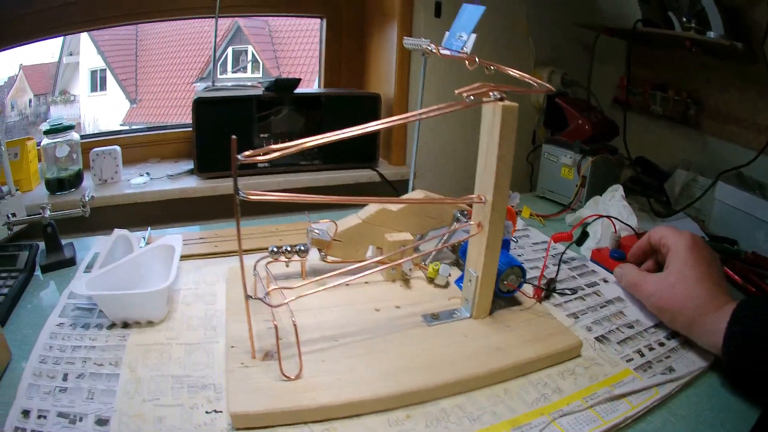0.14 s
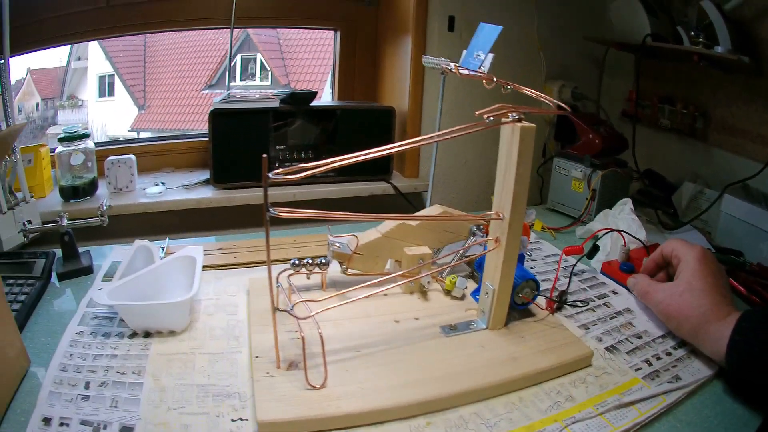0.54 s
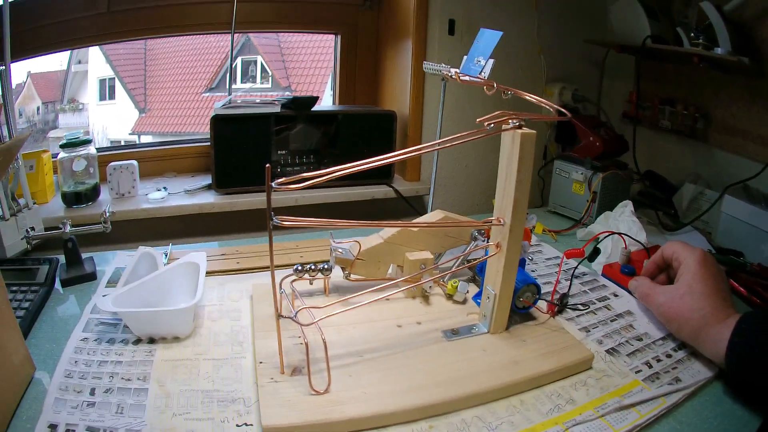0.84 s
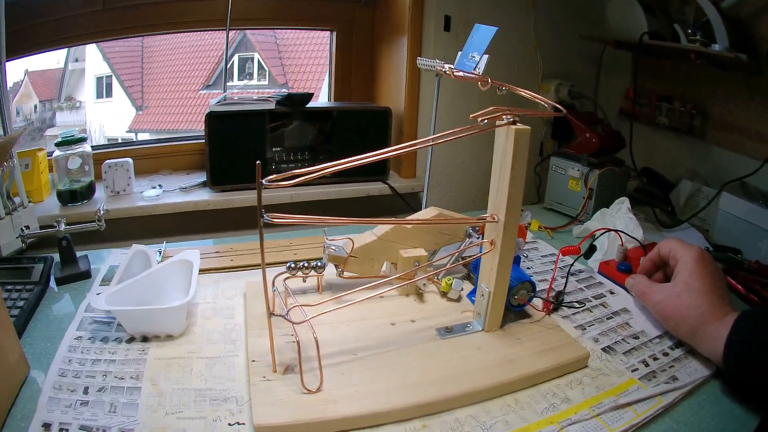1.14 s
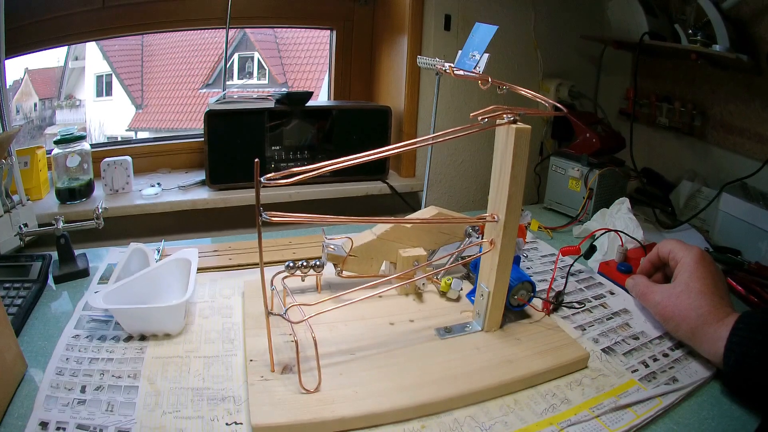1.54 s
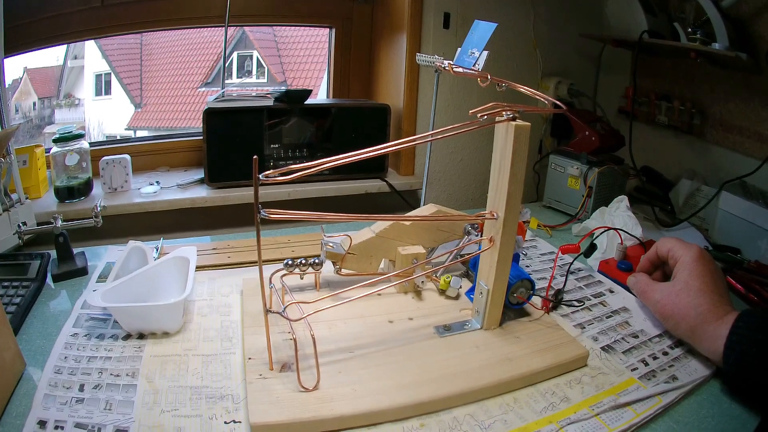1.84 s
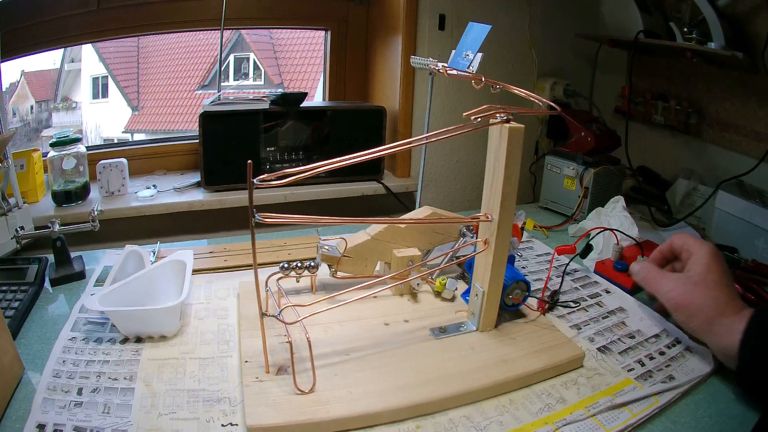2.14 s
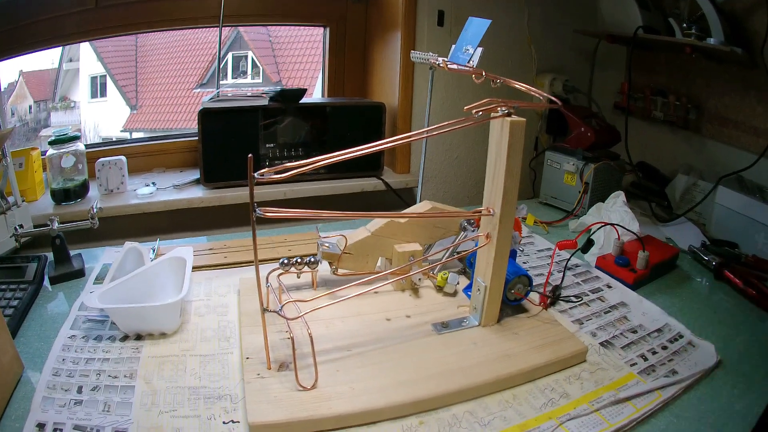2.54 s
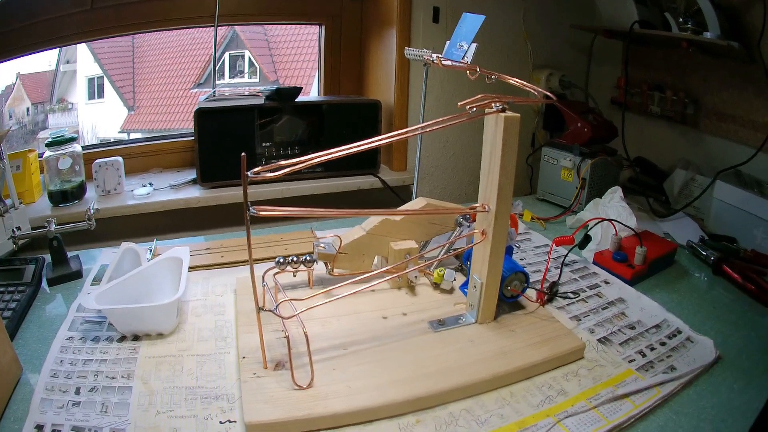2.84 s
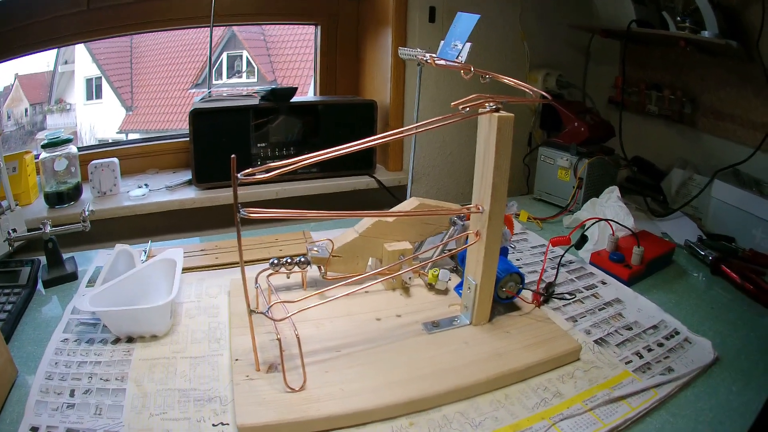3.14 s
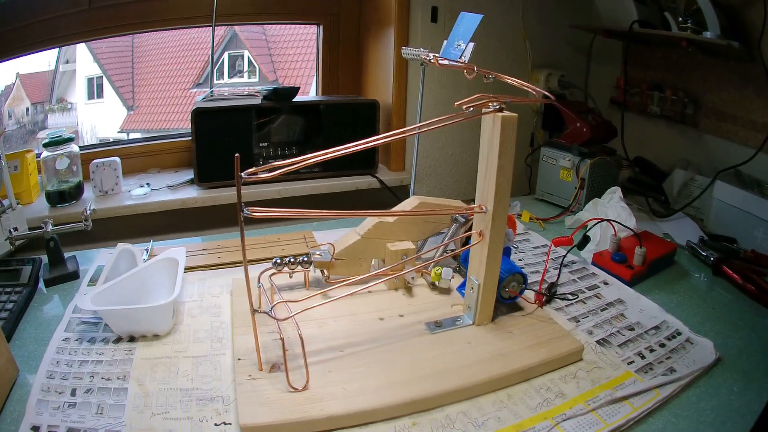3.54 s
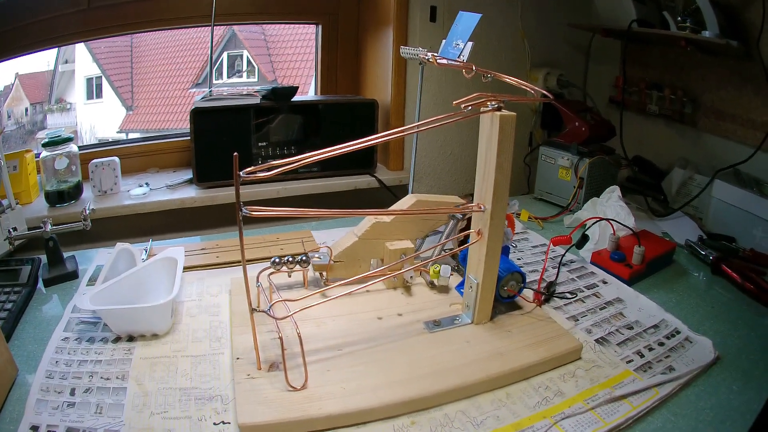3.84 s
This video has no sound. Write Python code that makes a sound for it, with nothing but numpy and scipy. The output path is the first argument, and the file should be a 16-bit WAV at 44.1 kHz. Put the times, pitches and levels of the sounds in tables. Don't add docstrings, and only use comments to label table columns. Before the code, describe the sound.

A small geared motor whirs on a wooden workbench board, starting suddenly after nearly two seconds of faint hiss, a sleeve rub and soft finger taps on a plastic switch; close microphone, small quiet room.

```python
import sys
import numpy as np
from scipy import signal
from scipy.fft import rfft, irfft, next_fast_len
from scipy.io import wavfile
from scipy.ndimage import uniform_filter1d, map_coordinates

SR = 44100
rng = np.random.default_rng(int(sys.argv[2]) if len(sys.argv) > 2 else 0)


def waveform_to_disk(signal):
    frames = np.transpose(np.atleast_2d(signal))
    scaled = np.clip(frames, -1, 1) * 32767
    samples = np.round(scaled).astype(np.int16)
    wavfile.write(sys.argv[1], SR, samples)


def level_to_linear(level):
    exponent = np.asarray(level, float) / 20
    return 10 ** exponent


N = 176400
T = np.arange(N) / SR
MOTOR_ON_S = 1.7535

# frequency in Hz, bandwidth in Hz, level in dB.
CHATTER_MODES = [(1730, 880, -4), (4710, 460, 3), (6300, 1300, -4.5), (7970, 1170, -5), (11000, 2500, -22)]


def unit(x):
    return x / np.sqrt(np.mean(x ** 2) + 1e-20)


def along(points, hz):
    f, v = np.transpose(points)
    return np.interp(np.log(hz + 1), np.log(f + 1), v)


def wobble(rate):
    knots = rng.standard_normal(int(N * rate / SR) + 4)
    return map_coordinates(knots, [T * rate])


def filtered(x, response):
    m = next_fast_len(N + SR // 2)
    return irfft(rfft(x, m) * response(np.fft.rfftfreq(m, 1 / SR)), m)[..., :N]


def ringing(x, modes, signs="+-" * 7):
    def response(f):
        total = 0
        for sign, (centre, width, db) in zip(signs, modes):
            resonance = 1j * f * width / (centre * centre - f * f + 1j * f * width)
            total = total + int(sign + "1") * level_to_linear(db) * resonance
        return total
    return filtered(x, response)


def coloured(spectrum, size=N):
    return unit(filtered(rng.standard_normal(size), lambda hz: level_to_linear(along(spectrum, hz))))


def gate(start, length, edge):
    return np.clip(np.minimum(T - start, start + length - T) / edge + .5, 0, 1)


def fade(start, t60, rise):
    u = np.maximum(T - start, 0)
    return (1 - np.exp(-(u / rise) ** 2)) * level_to_linear(-60 * u / t60)


def preamp_hiss():
    # frequency in Hz, level in dB per Hz.
    hiss_spectrum = [(88, -31), (150, -5), (351, -6), (469, -6), (615, -9), (1520, -14), (2470, -13),
                     (15200, -18)]
    # frequency in Hz, left-right correlation from -1 to 1.
    likeness = [(60, -0.68), (240, 1), (950, 0.98), (3770, 0.37), (15000, 0.67)]

    def mid_side_split(hz):
        angle = np.arccos(np.clip(along(likeness, hz), -1, 1)) / 2
        return np.array([np.cos(angle), np.sin(angle)])
    noise = coloured([(90, -60), (135, -25)] + hiss_spectrum, size=(2, N))
    mid, side = filtered(noise, mid_side_split)
    return level_to_linear(-62.5 + 1.6 * wobble(5.2)) * np.array([mid, side]) / np.std(mid)


def low_drift():
    # frequency in Hz, level in dB per Hz.
    drift_spectrum = [(2, 8), (20, -14), (40, -12.5), (62, -33), (85, -34), (110, -120)]
    return level_to_linear(-55.5) * coloured(drift_spectrum)


def circuit_buzz():
    # frequency in Hz, bandwidth in Hz, level in dB.
    buzz_modes = [(3290, 110, -5), (6610, 330, -3), (9700, 330, -6)]
    rate_hz, first_s, burst_t60, weak = 48.82, .0022, 0.022, 0.36
    beat = (T - first_s) * rate_hz
    strong_burst = level_to_linear(-60 * (beat % 1) / rate_hz / burst_t60)
    weak_burst = weak * level_to_linear(-60 * ((beat + .5) % 1) / rate_hz / burst_t60)
    buzz = unit(ringing((strong_burst + weak_burst) * rng.standard_normal(N), buzz_modes))
    return level_to_linear(-69.5 + 1.0 * wobble(5.8)) * buzz + level_to_linear(-69) * np.sin(2 * np.pi * beat)


def supply_sags():
    sag_times = [.178, .69, 1.18, 1.735, 2.2]
    depth, width_s, after_s, after_depth = 0.0061, 0.0072, .068, 0.69

    def dip(s):
        return np.exp(-((T - s) / width_s) ** 2)
    return depth * sum(dip(s) + after_depth * dip(s + after_s) for s in sag_times)


def camera():
    mid, side = preamp_hiss()
    mid = mid + circuit_buzz() + low_drift()
    side = side - supply_sags()
    return np.array([mid + side, mid - side])


def sleeve_rub():
    rub = coloured([(60, -120), (90, -1), (200, 1), (320, -10), (500, -30), (700, -120)])
    return level_to_linear(-61.5 + 2.5 * wobble(34)) * gate(0.052, .18, 0.047) * rub


def finger_taps():
    # start in seconds, level in dB, frequency in Hz.
    taps = [
        (.303, -47, 656),
        (.7165, -34, 613),
        (.978, -45, 603),
        (1.2835, -29, 633),
        (1.495, -25.5, 625),
        (2.81, -23, 680),
    ]
    t60, rise_s, after_s, after_db = 0.021, 0.0028, 0.0064, -12.5
    out = 0
    for s, db, hz in taps:
        envelope = fade(s, t60, rise_s) + level_to_linear(after_db) * fade(s + after_s, t60, rise_s)
        out = out + level_to_linear(db) * envelope * np.sin(2 * np.pi * hz * (T - s))
    return out


def switch_creaks():
    # start in seconds, level in dB.
    clicks = [
        (0.377, -51.5),
        (.62, -60.5),
        (1.691, -45.5),
        (1.71, -58),
    ]
    creak = unit(ringing(rng.standard_normal(N), [(2200, 220, 8), (3500, 610, 0.5), (4300, 420, -3)]))
    return sum(level_to_linear(db) * fade(s, 0.038, 0.00087) for s, db in clicks) * creak


def start_thud():
    return level_to_linear(-30.5) * fade(MOTOR_ON_S, 0.051, 0.00067) * np.sin(2 * np.pi * 250 * (T - MOTOR_ON_S))


def gear_teeth(cycles):
    jitter, wash = .35, 0.67
    scatter_db, biggest = 3.5, 1.6
    at = np.flatnonzero(np.diff(np.floor(cycles)))
    timing, size = rng.standard_normal((len(at), 2)).T
    at = np.clip(at + jitter * timing * np.gradient(at), 0, N - 1).astype(int)
    blows = np.bincount(at, level_to_linear(scatter_db * np.minimum(size, biggest)), N)
    scrapes = np.convolve(blows, level_to_linear(-60 * T[:SR // 50] / 0.0061))[:N]
    turn = np.cos(2 * np.pi * cycles / 10 + 1 * wobble(11))
    swell = level_to_linear(2 * turn + 0.5 * wobble(60) + 1.0 * wobble(14))
    return swell * (unit(scrapes) + wash) * rng.standard_normal(N)


def backlash_knocks():
    # start in seconds, peak level in dB.
    knocks = [
        (1.7532, -28.5),
        (1.9494, -25.5),
        (2.3306, -22),
        (2.4663, -30),
        (2.809, -25),
        (3.6896, -23.5),
    ]
    return sum(level_to_linear(db) * fade(s, 0.037, 0.0004) for s, db in knocks) * rng.standard_normal(N)


def structure_rattle(drive, knock, strength):
    # frequency in Hz, bandwidth in Hz, level in dB.
    housing_modes = [(2132, 127, -13.5), (2255, 201, 2), (3050, 200, -4), (3304, 185, -1.5),
                     (3536, 227, 3.5), (3800, 89, -3.5), (4367, 235, -10.5), (4740, 62, -18),
                     (5370, 123, -11), (6110, 100, -23), (6850, 95, -20), (8100, 270, -15),
                     (8720, 220, -22.5), (11400, 81, -56)]
    # frequency in Hz, bandwidth in Hz, level in dB.
    board_modes = [(249, 230, -31), (434, 60, -18), (571, 58, -12.5), (680, 24, -14.5), (979, 85, -9.5),
                   (1080, 82, -12), (1510, 57, -39)]

    def levelled(x):
        return x * np.linalg.norm(strength) / np.linalg.norm(x)
    housing = levelled(ringing(drive + 1.3 * knock, housing_modes, "++++-+-+-+-+-+"))
    return housing + level_to_linear(-14.5) * levelled(ringing(drive, board_modes))


def air_noise(on, rattle_db):
    # frequency in Hz, level in dB per Hz.
    air_spectrum = [(88, -59), (150, -16), (1030, -12), (1380, -30), (2140, 4.5), (2700, -27), (3400, -2.5),
                    (8410, -18), (15000, -53)]
    return level_to_linear(-8) * on * level_to_linear(rattle_db + 1.18 * wobble(40)) * coloured(air_spectrum)


def mesh_tone(order, cycles, level_db):
    phase = order * (2 * np.pi * cycles + 0.51 * wobble(30))
    return level_to_linear(level_db + 1.5 * wobble(25.07)) * np.sin(phase)


def strain_chatter(cycles):
    return level_to_linear(-39) * gate(1.945, .265, 0.0066) * unit(ringing(gear_teeth(cycles), CHATTER_MODES))


def passing_hums():
    # start in seconds, length in seconds, frequency in Hz, bandwidth in Hz.
    hums = [(1.93, .3, 436, 10), (1.9, .33, 461, 12), (2.95, 1.1, 953, 22), (3.35, .55, 680, 12),
            (3.83, .25, 148, 5), (3.3, .7, 450, 14), (3.2, .9, 1560, 40), (1.85, .35, 940, 50)]
    # level of the hum in the same row, in dB.
    hum_levels = [-43.5, -43, -46, -51.5, -56, -53.5, -51, -48.5]
    out = 0
    for (s, length, centre, width), db in zip(hums, hum_levels):
        narrow = ringing(rng.standard_normal(N), [(centre, width, 0)])
        hum = ringing(narrow, [(centre, 2 * width, 0)])
        out = out + level_to_linear(db) * gate(s, length, 0.066) * unit(hum)
    return out


def motor():
    # time in seconds, tooth rate in Hz, rattle in dB, mesh tone in dB, its octave in dB.
    run = [(1.755, 551.2, -34.5, -51, -61), (1.84, 565, -29.5, -47.5, -51), (1.95, 575.2, -27, -42, -53),
           (2.05, 572, -25.5, -47, -55), (2.2, 576.3, -25.5, -51, -49), (2.26, 581.8, -28.5, -49.5, -48),
           (2.36, 576.7, -28, -39.5, -45), (2.55, 556.4, -26.5, -37, -53), (2.75, 540.3, -27.5, -44.5, -35),
           (2.818, 545.7, -26, -55, -39.5), (2.95, 537.1, -27.5, -50, -37.5), (3.2, 530.6, -26.5, -58, -39),
           (3.46, 523, -28, -51, -37.5), (3.58, 520.3, -27, -48.5, -62), (3.76, 522, -27.5, -50, -34),
           (3.9, 488, -26.5, -56, -40.5), (4.0, 467, -29, -56.5, -51)]
    s, *columns = np.transpose(run)
    tooth_hz, rattle_db, tone_db, octave_db = [np.interp(T, s, c) for c in columns]
    cycles = np.cumsum(tooth_hz + 2.5 * wobble(14)) / SR
    on = np.clip((T - MOTOR_ON_S) / 0.0013, 0, 1)
    strength = on * level_to_linear(rattle_db)
    knock = backlash_knocks()
    out = start_thud() + structure_rattle(strength * gear_teeth(cycles), knock, strength)
    out += air_noise(on, rattle_db)
    out += on * (mesh_tone(1, cycles, tone_db) + mesh_tone(2, cycles, octave_db))
    out += strain_chatter(cycles) + 1.73 * ringing(knock, CHATTER_MODES)
    return out + passing_hums()


def room(x):
    t = T[:SR // 3]
    tail = uniform_filter1d(rng.standard_normal(len(t)), size=3) * level_to_linear(-60 * t / 0.22)
    delayed = np.pad(x, (200, 0))
    return signal.fftconvolve(delayed, tail / np.linalg.norm(tail))[:N]


def scene():
    # frequency in Hz, gain in dB.
    capsule = [(100, -9), (350, -1.5), (1100, 0), (1350, -5), (1800, 0), (8800, 0), (10000, -2.5),
               (13000, -8)]
    own_noise = camera()
    touch = sleeve_rub() + finger_taps() + switch_creaks()
    whir = filtered(motor(), lambda hz: level_to_linear(along(capsule, hz)))
    return whir + touch + room(level_to_linear(-12.5) * whir + level_to_linear(-24) * touch) + own_noise


def band_limit(x):
    return signal.sosfilt(signal.butter(12, 15600, fs=SR, output="sos"), x)


def record(dry):
    common, opposed = .0011, .047
    offsets = np.array([[common + opposed], [common - opposed]])
    mix = filtered(dry, lambda hz: hz < 15290) + offsets
    return band_limit(mix)


dry = scene()
out = record(dry)
waveform_to_disk(out)
```